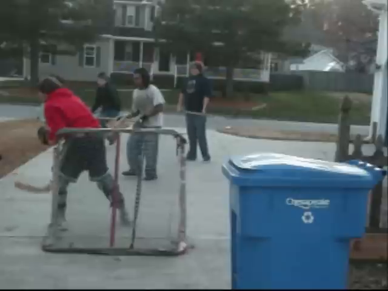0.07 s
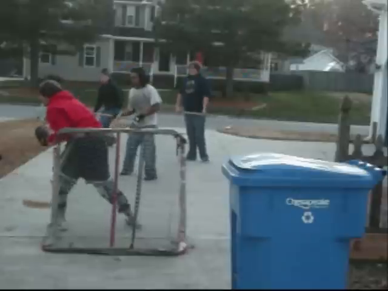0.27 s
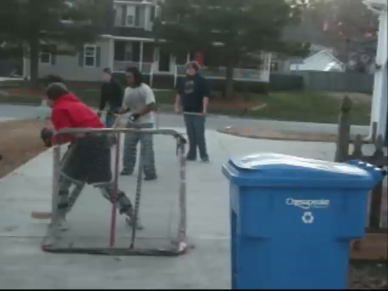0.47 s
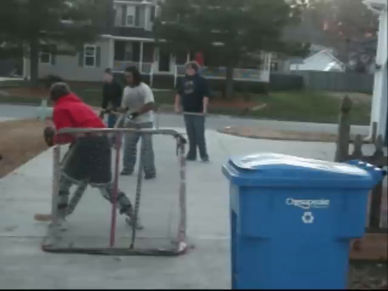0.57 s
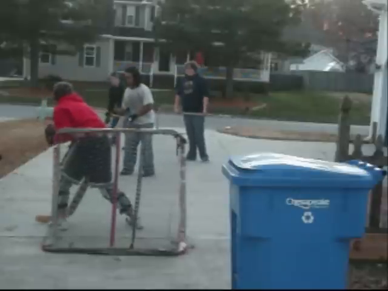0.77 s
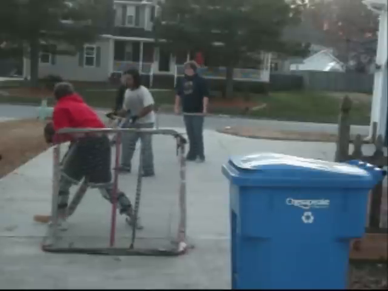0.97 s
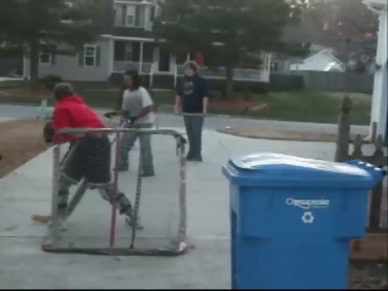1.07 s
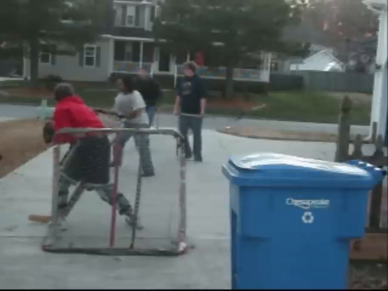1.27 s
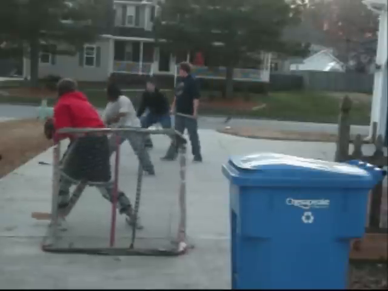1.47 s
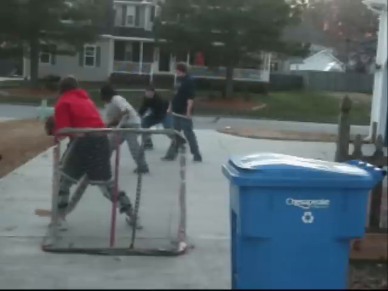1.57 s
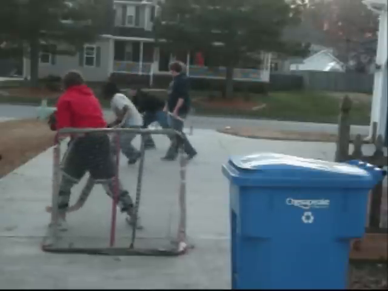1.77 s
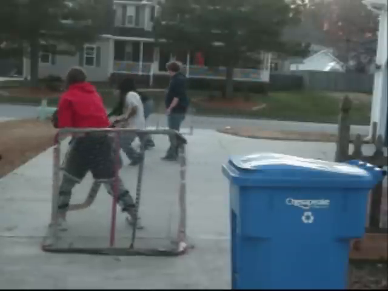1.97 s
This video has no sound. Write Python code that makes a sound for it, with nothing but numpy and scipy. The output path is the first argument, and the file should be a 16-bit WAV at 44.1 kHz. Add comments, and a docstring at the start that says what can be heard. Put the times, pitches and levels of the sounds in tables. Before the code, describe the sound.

A hard street hockey stick slap cracks a ball on a concrete driveway, echoing off houses

```python
"""A concrete driveway: street hockey, one hard slap of a stick blade on a ball, built from decaying blade modes
and thrown back by garage door, bin and house fronts as short echoes and scattered noise. The ball knocks
twice more as a jolted resonance; grit and blade tips tick as brief rings; shoes and blades scuff as rough
noise bursts; distant traffic is shaped noise with a low drone. A small narrow-band microphone clips."""
import sys
import numpy as np
from scipy import signal
from scipy.fft import rfft, irfft
from scipy.io import wavfile
from scipy.ndimage import uniform_filter1d

SR = 44100
rng = np.random.default_rng(int(sys.argv[2]) if len(sys.argv) > 2 else 0)


def volts_from_decibels(level):
    """Turn decibel levels (scalar or array-like) into linear amplitude factors."""
    exponent = np.asarray(level, float) / 20
    return 10 ** exponent


def to_wav(s):
    """Save 16-bit WAV."""
    ch = np.atleast_2d(s).T  # columns
    pcm = np.round(np.clip(ch, -1, 1) * 32767)  # PCM
    wavfile.write(sys.argv[1], SR, pcm.astype(np.int16))


N = 88861

# Colour of the distant traffic. Each row: frequency in Hz, relative level per Hz in dB.
TRAFFIC_COLOUR = [(12, -43), (20, -8.5), (86, -3.5), (207, -10.5), (395, -9), (501, -9), (950, -11),
                  (1500, -16.5), (1860, -20), (4960, -24.5), (5450, -29), (6000, -60), (13200, -120)]
# Scuffs of shoes and blades. Each row: start in seconds, length in seconds, rms level before the
# envelope in dB, centre in Hz, width in Hz of the narrower of two filter passes.
SCUFF_BURSTS = [(0.0, 0.057, -41, 1090, 300), (0.013, 0.024, -41, 3800, 3480),
                (0.056, 0.012, -42.5, 2580, 2460), (.058, 0.0087, -41, 1410, 250),
                (0.105, 0.011, -45.5, 4060, 3000), (.161, 0.008, -42.5, 3000, 6000),
                (.162, 0.012, -39.5, 950, 496), (0.195, 0.011, -52, 2190, 1800),
                (0.277, .03, -46.5, 3700, 2500), (0.324, 0.053, -45.5, 2830, 2020),
                (0.383, 0.063, -47.5, 4400, 3000), (0.722, 0.05, -45.5, 4570, 2500),
                (0.758, 0.011, -42, 3200, 4000), (0.779, 0.016, -38, 593, 900),
                (0.791, 0.023, -39.5, 1200, 2580), (0.843, 0.015, -43.5, 1400, 2000),
                (0.926, 0.032, -43, 4600, 2000), (0.929, 0.014, -44, 1070, 403),
                (0.953, 0.016, -45.5, 2530, 696), (1.004, 0.044, -49, 4500, 3000),
                (1.06, 0.016, -43, 3400, 4030), (1.171, 0.02, -41.5, 700, 1740),
                (1.202, 0.012, -45, 900, 2500), (1.348, 0.01, -54, 2500, 3060),
                (1.445, 0.0056, -53, 4530, 2500), (1.513, .02, -48, 2970, 4000),
                (1.527, 0.029, -39.5, 1940, 4000), (1.812, 0.04, -48, 4600, 810),
                (1.936, 0.013, -47.5, 1500, 2940)]
# Ticks of grit and blade tips. Each row: start in seconds, peak in dB, pitch in Hz,
# 60 dB decay in seconds.
GRIT_TICKS = [(0.029, -32.5, 4730, 0.0097), (0.0573, -24, 2600, 0.0045), (.1615, -28.5, 4700, 0.0032),
              (0.201, -31, 2200, .006), (.7573, -27.5, 2730, 0.0032), (0.7629, -29, 2580, 0.0026),
              (.7805, -30, 650, 0.0044), (0.8453, -24.5, 1400, 0.0039), (.953, -24, 4660, 0.0032),
              (.958, -23, 2690, 0.0047), (1.453, -31, 4740, .004), (1.8471, -27, 1800, 0.0027)]
# Knocks of the ball on concrete. Each row: start in seconds, peak in dB, resonance in Hz,
# width in Hz, time constant of the push in seconds.
BALL_KNOCKS = [(1.6932, -20.5, 1010, 150, .0002), (1.8456, -16, 700, 2600, 0.00031)]
# Ringing modes of the blade, neighbours in opposite phase. Each row: frequency in Hz, level before
# the build-up in dB, 60 dB decay in seconds.
BLADE_MODES = [(380, -31, .03), (660, -21, .018), (1000, -15, .016), (2300, 1, .0044), (2990, 4.8, .0085),
               (4150, -11, .018)]
# Single echoes of the slap. Each row: delay in seconds, peak in dB, centre in Hz of what the surface
# returns, 60 dB decay in seconds, smear in seconds.
SURFACE_ECHOES = [(.0015, -14, 4900, .004, .0004), (.003, -6, 2270, 0.006, .0004),
                  (0.0092, -18, 2930, 0.003, 0.00198), (0.02, -6.5, 3750, 0.0023, .0002),
                  (.0197, -14, 4900, .008, .001), (.0205, -3, 3030, 0.004, .0003),
                  (.0219, -11.5, 2900, 0.0048, .0005), (0.0245, -14, 2420, .004, .0005),
                  (.0288, -8.5, 3950, 0.0057, .0005), (.0298, -10.5, 4780, 0.011, .001),
                  (0.0422, -24, 1250, .008, .001), (0.038, -19, 3540, .004, .002),
                  (0.0445, -13, 4700, 0.0078, .0004), (0.0504, -20, 3000, .006, .001),
                  (0.1158, -27, 4900, 0.007, 0.0035), (0.127, -20, 3000, 0.0046, .0006)]
# Scattered sound of the slap. Each row: rms level before the envelope in dB, start after the slap in
# seconds, hold in seconds, 60 dB decay in seconds, centre in Hz, width in Hz of each of two passes.
SCATTERED_SOUND = [(-19.5, 0.0013, 0.015, 0.016, 2460, 2250), (-26.5, 0.004, 0.028, 0.13, 4530, 1200),
                   (-29, 0.0057, 0.032, 0.094, 1160, 1500), (-25.5, 0.0033, 0.032, 0.18, 2940, 1700),
                   (-33.5, 0.048, 0.057, 0.6, 2940, 5000), (-40, 0.053, 0.16, 0.84, 1110, 1180),
                   (-44.5, 0.046, 0.25, 1.4, 2590, 1400), (-33.5, 0.107, 0.018, 0.04, 4880, 700)]


def unit(x):
    """Scale to rms 1."""
    return x / np.sqrt(np.mean(x ** 2))


def peak_at(x, db):
    """Scale to a peak level in dB."""
    return volts_from_decibels(db) * x / np.abs(x).max()


def band(x, hz, width_hz):
    """Two-pole resonance, gain 1 at the centre."""
    return signal.lfilter(*signal.iirpeak(hz, hz / width_hz, fs=SR), x)


def decay(t, t60):
    """Exponential decay that falls 60 dB in t60 seconds."""
    return np.exp(-np.log(1000) * t / t60)


def ring(hz, t60, delay=0., size=2048):
    """A struck mode: a sine that dies away exponentially."""
    t = np.maximum(np.arange(size) / SR - delay, 0)
    return np.sin(2 * np.pi * hz * t) * decay(t, t60)


def add(out, x, at):
    """Mix x into out from time at."""
    i = int(at * SR)
    out[i:i + len(x)] += x[:N - i]


def walk(rate):
    """Random levels held for 1 / rate seconds, then slewed; spread near 1."""
    hold = int(SR / rate)
    steps = np.repeat(rng.standard_normal(N // hold + 1), hold)
    return 1.67 * uniform_filter1d(uniform_filter1d(steps, hold), hold)[:N]


def traffic():
    """Distant traffic: shaped noise whose half-octave bands flicker independently, and a low engine drone."""
    noise_db, drone_db, flicker_db, flicker_per_s = -40, -50.5, 0.84, 12.2
    f = np.fft.rfftfreq(N, 1 / SR) + 1  # keeps the logarithm finite at 0 Hz
    table_hz, table_db = np.array(TRAFFIC_COLOUR).T
    colour = volts_from_decibels(np.interp(np.log(f), np.log(table_hz), table_db))
    spectrum = rfft(rng.standard_normal(N)) * colour
    noise = np.zeros(N)
    for k in range(18):
        # overlapping triangles, half an octave apart from 20 Hz up
        share = np.clip(1 - np.abs(2 * np.log2(f / 20) - k), 0, 1)
        noise += irfft(spectrum * share, N) * volts_from_decibels(flicker_db * walk(flicker_per_s))
    drone = band(rng.standard_normal(N), 83.4, 11)
    return volts_from_decibels(noise_db) * unit(noise) + volts_from_decibels(drone_db) * unit(drone)


def scuffs():
    """Friction on concrete: noise roughened by random level jumps, with quick rise, hold and short tail."""
    grit_db, grit_per_s = 3.5, 600
    rise, tail = 0.17, 0.99  # rise time and tail time constant, as fractions of the length
    out, t = np.zeros(N), np.arange(8192) / SR
    for at, length, db, hz, width_hz in SCUFF_BURSTS:
        attack = np.clip(t / (rise * length), 0, 1)
        env = attack * np.exp(-np.maximum(t - length, 0) / (tail * length))
        rough = uniform_filter1d(rng.standard_normal(len(t)), int(SR / grit_per_s))
        rough = rough * np.sqrt(SR / grit_per_s)  # restores a spread near 1 after smoothing
        friction = volts_from_decibels(grit_db * rough) * rng.standard_normal(len(t))
        coloured = band(band(friction, hz, 2 * width_hz), hz, width_hz)
        add(out, volts_from_decibels(db) * env * unit(coloured), at)
    return out


def ticks():
    """Grit and blade tips tick: each contact is one brief ring through a broad resonance."""
    out = np.zeros(N)
    for at, db, hz, t60 in GRIT_TICKS:
        add(out, peak_at(band(ring(hz, t60), hz, 2 * hz), db), at)
    return out


def knocks():
    """The hollow ball meets concrete: the jolt of a bell-shaped push rings one dull resonance."""
    out = np.zeros(N)
    t = np.arange(1024) / SR - .001  # the push peaks 1 ms after the start
    for at, db, hz, width_hz, contact in BALL_KNOCKS:
        jolt = (1 - (t / contact) ** 2) * np.exp(-.5 * (t / contact) ** 2)
        add(out, peak_at(band(jolt, hz, width_hz), db), at)
    return out


def blade_crack(late):
    """The blade's modes ring together, building up while the ball is squeezed."""
    build_s = .0003
    crack = np.zeros(2048)
    for k, (hz, db, t60) in enumerate(BLADE_MODES):
        crack -= (-1) ** k * volts_from_decibels(db) * ring(hz, t60, late)
    t = np.maximum(np.arange(len(crack)) / SR - late, 0)
    return crack * (1 - np.exp(-t / build_s))


def surface_echo(db, hz, t60, smear):
    """A nearby surface returns a coloured ring, smeared by a decaying noise tail."""
    i = np.arange(900)
    rough = 0.39 * rng.standard_normal(900) * np.exp(-i / SR / smear) / np.sqrt(smear * SR)
    rough[0] = 1  # the direct reflection
    return peak_at(band(np.convolve(ring(hz, t60), rough), hz, 2 * hz), db)


def scattered(t, db, start, hold, t60, hz, width_hz):
    """Many small reflections merge into band noise that rises, holds and dies away."""
    env = np.clip((t - start) / 0.0027, 0, 1) * decay(np.maximum(t - start - hold, 0), t60)
    noise = band(band(rng.standard_normal(N), hz, width_hz), hz, width_hz)
    return volts_from_decibels(db) * env * unit(noise)


def slap():
    """Blade strikes ball; garage door, bin and house fronts return echoes and scattered noise."""
    slap_s = 1.56671
    out, t = np.zeros(N), np.arange(N) / SR - slap_s
    late = slap_s * SR % 1 / SR  # start time left over within one sample
    add(out, blade_crack(late), slap_s)
    for delay, db, hz, t60, smear in SURFACE_ECHOES:
        add(out, surface_echo(db, hz, t60, smear), slap_s + delay)
    for row in SCATTERED_SOUND:
        out += scattered(t, *row)
    return out


def scene():
    """Everything at one microphone."""
    return (traffic() + scuffs() + ticks() + knocks() + slap())[None]


def band_limit(x):
    """A steep low-pass at the top of the band."""
    return signal.sosfilt(signal.butter(12, 15970, fs=SR, output="sos"), x)


def record(dry):
    """The small microphone: a steep treble limit, hard clipping at full scale, then a small constant offset."""
    top_hz, offset = 5270, -0.0035
    lowpass = signal.ellip(8, .1, 70, top_hz, fs=SR, output="sos")
    narrow = signal.sosfiltfilt(lowpass, dry)
    mix = np.clip(narrow, -1, 1) + offset
    return band_limit(mix)


dry = scene()
out = record(dry)
to_wav(out)
```